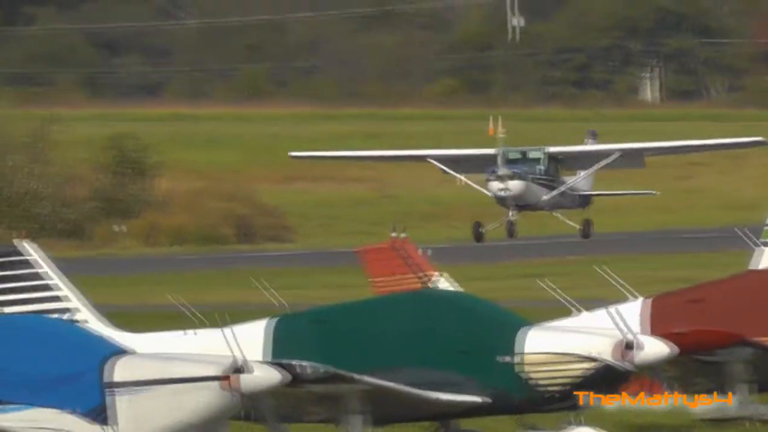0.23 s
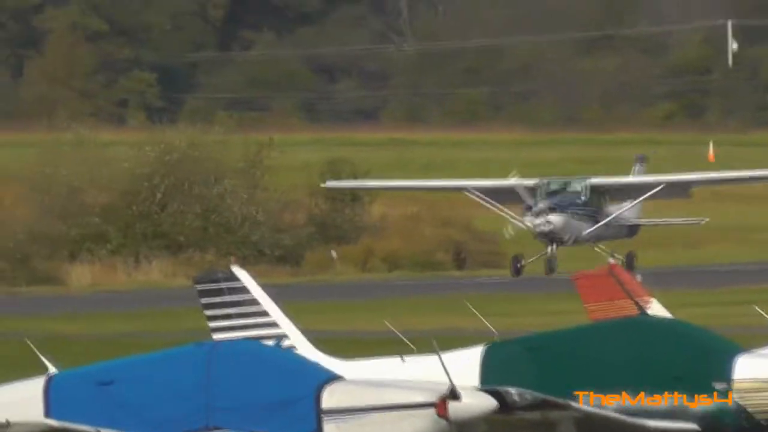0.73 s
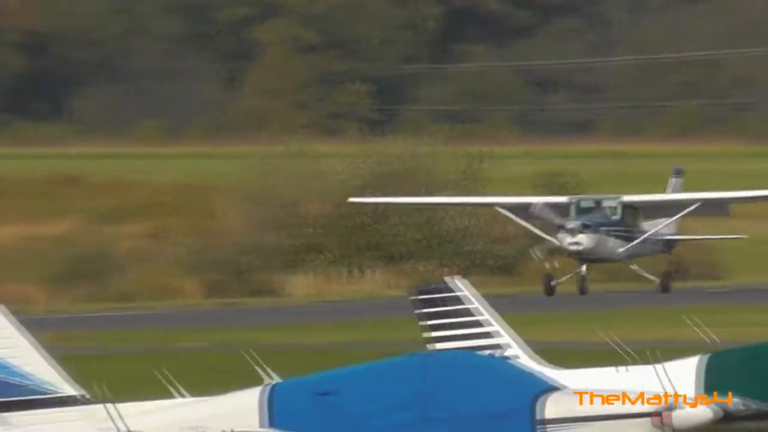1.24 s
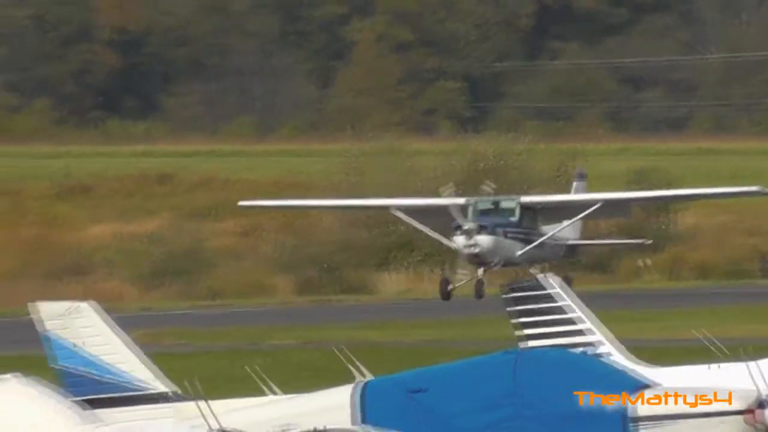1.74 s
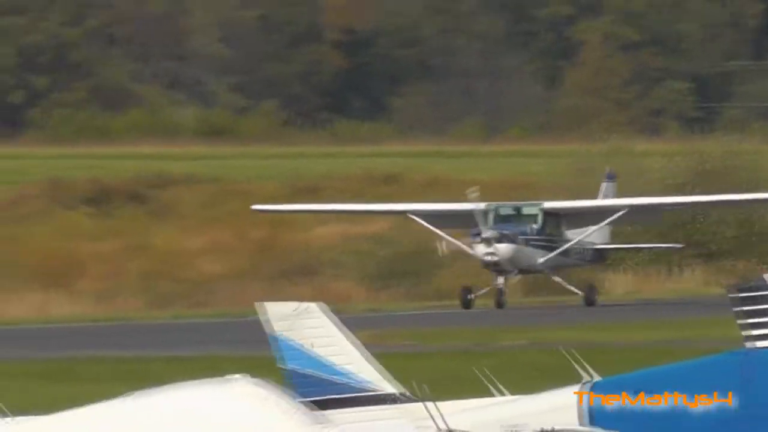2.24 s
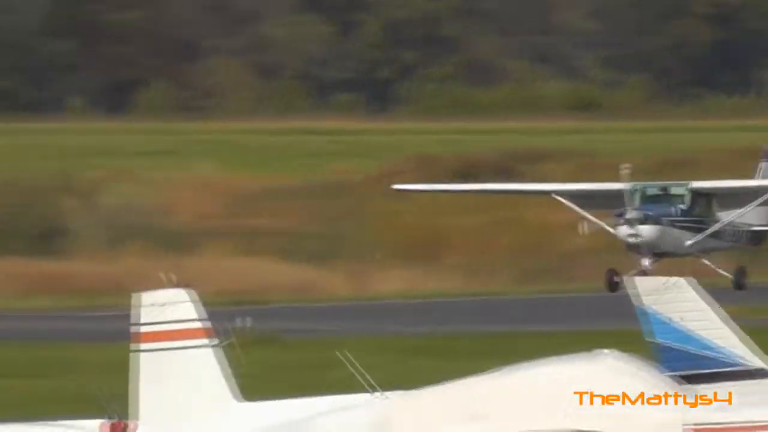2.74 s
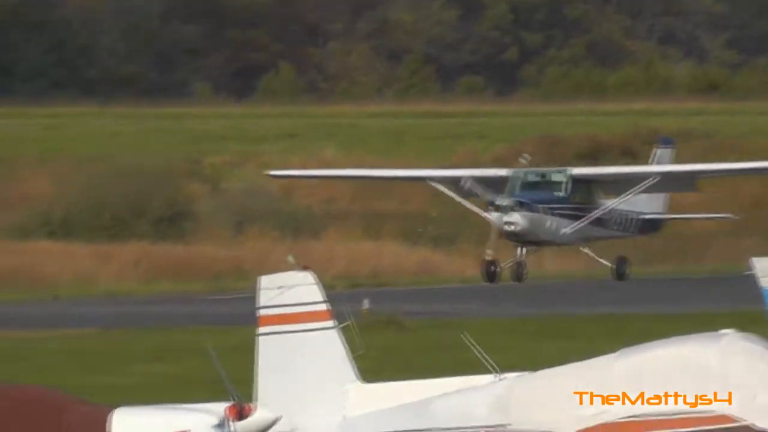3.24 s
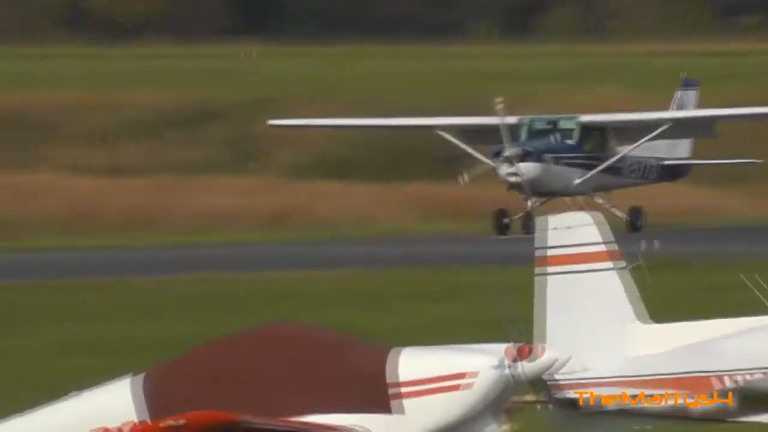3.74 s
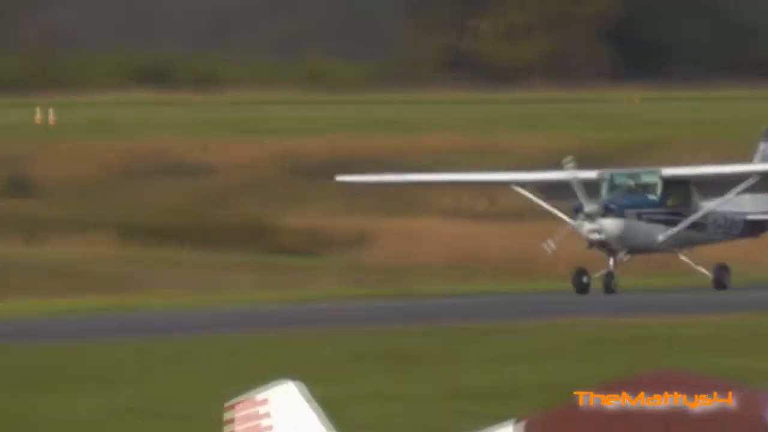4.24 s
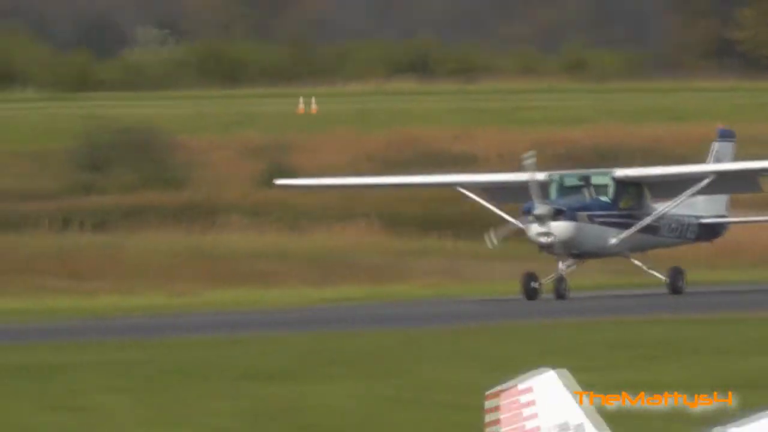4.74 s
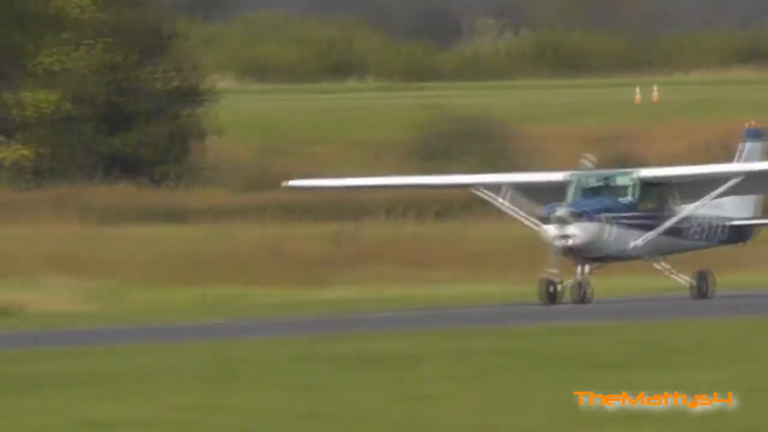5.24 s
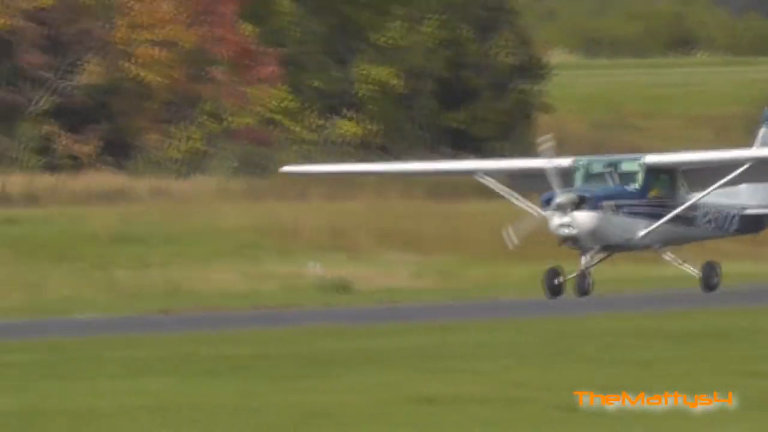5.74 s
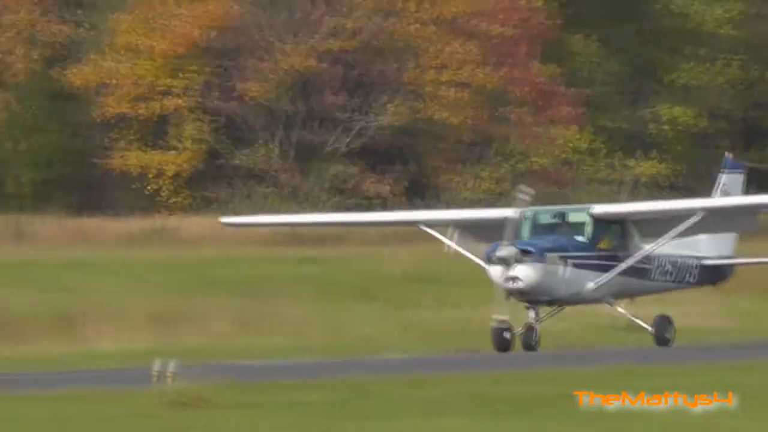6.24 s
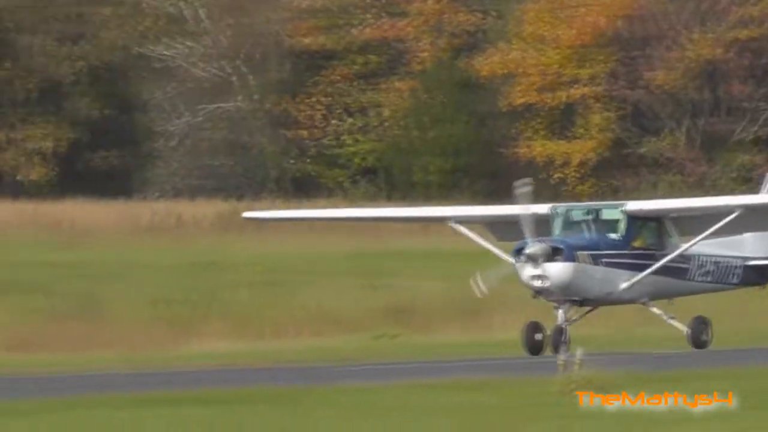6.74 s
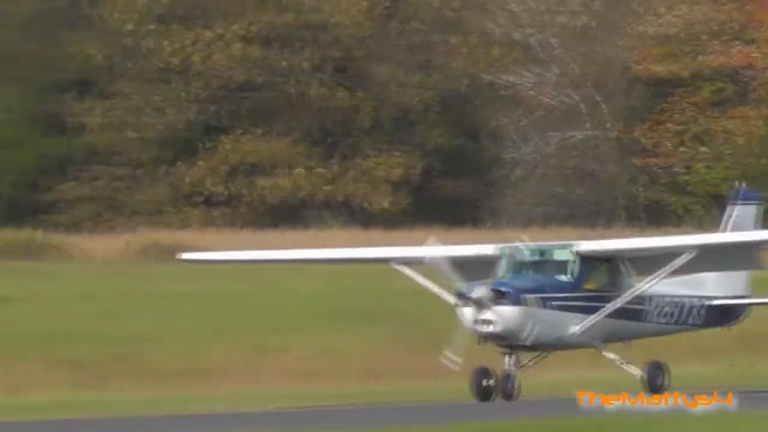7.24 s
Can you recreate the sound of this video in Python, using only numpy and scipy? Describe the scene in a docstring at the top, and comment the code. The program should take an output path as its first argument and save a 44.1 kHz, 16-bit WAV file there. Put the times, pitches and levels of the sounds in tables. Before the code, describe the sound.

A light aircraft's piston engine starts outdoors. First come quiet, separate exhaust coughs and one soft rush of air over a steady background hum. After nearly two seconds the cylinders fire, and the low, thumping note climbs quickly in pitch and loudness, with a rasping hiss on top. Past the middle it winds down to a lumpy, popping idle, heard from one spot on the airfield.

```python
"""On an airfield, over the drone and hum of a steady machine, a seven-cylinder radial engine is cranked.
It coughs single puffs that ring in the exhaust stacks, and a soft rush passes between them.
At 1.7 s it catches: the firings build a low tone, thump in the pipes and spit hiss from the stacks.
It revs up until about 4 s, then settles back with stumbles and stray putts.
Throughout, surfaces close to the microphone cut narrow notches into everything."""
import sys
import numpy as np
from scipy import signal
from scipy.fft import rfft, irfft, next_fast_len
from scipy.io import wavfile
from scipy.ndimage import uniform_filter1d, map_coordinates

SR = 44100
rng = np.random.default_rng(int(sys.argv[2]) if len(sys.argv) > 2 else 0)


def pcm_store(signal):
    """Save signal as 16-bit PCM."""
    levels = np.round(np.clip(np.atleast_2d(signal), -1, 1) * 32767)
    wavfile.write(sys.argv[1], SR, levels.astype(np.int16).T)


N = 329868
TIME = np.arange(N) / SR

# each cylinder's firing (place in the engine cycle [0-1], thump [dB], spit [dB])
CYLINDER_FIRINGS = [(0.018, -5.5, -2.5), (0.153, 3.5, -6), (0.291, -7, -2), (0.398, 5, -8), (.56, -5, -5.5),
                    (.72, 8.5, -3), (0.9, -1.5, -7)]
# midrange bark of the stacks (frequency [Hz], level [dB])
BARK_COLOUR = [(250, -48.5), (340, -2), (440, -4), (520, -9.5), (655, -1), (740, -6.5), (850, -7),
               (1120, -9), (1700, -19), (2000, -51.5)]


def engine():
    """The running engine: cylinders fire in turn, and the throttle drives every exhaust layer."""
    # revs (time [s], firing rate [1/s])
    revs = [(1.7, 32.2), (2.1, 40.5), (2.3, 43), (2.7, 53.8), (2.9, 57.7), (3.3, 63.3), (3.7, 66.7),
            (4.2, 68.6), (4.5, 67.9), (5.1, 65.1), (5.5, 63.4), (5.7, 62), (6.3, 55.7), (6.9, 48.6),
            (7.47, 47.2)]
    # throttle as loudness against full power (time [s], level [dB])
    throttle = [(1.8, -7), (2.1, -3.5), (2.7, 0.5), (3.0, -0.85), (3.5, 0.6), (4.2, -1.6), (4.8, -4.5),
                (5.4, -5.5), (5.7, -6.5), (6.2, -13), (6.9, -12.5), (7.2, -11), (7.48, -14)]
    # how far the engine has settled (time [s], share [0-1])
    settling = [(4.2, 0.043), (5.2, 0.36), (6.2, 0.82), (7.48, 1)]
    # tone, thump, bark, hiss, fizz (full-power level [dB], throttle follow [dB/dB], settled gain [dB])
    layers = [(-30, 0.8, 3.6), (-32.5, 0.28, -1), (-36.5, 1.01, 0.4), (-40, 0.91, 0.5), (-55.5, 0.59, -1.5)]
    catch_s = revs[0][0]
    since_catch = TIME - catch_s
    running = since_catch > 0
    settled = curve(settling)
    tone_db, thump_db, bark_db, hiss_db, fizz_db = (
        db + follow * curve(throttle) + settled_db * settled for db, follow, settled_db in layers)
    fizz_db -= 1.58 * np.minimum(since_catch, 3.8)  # the fizz dulls for 3.8 s as the engine warms

    cycle_hz = curve(revs) / len(CYLINDER_FIRINGS)
    cycle = np.cumsum(cycle_hz * running) / SR
    pushes, spits = firings(cycle, running)
    build_up = np.clip(since_catch / 0.78, 0, 1) ** 2
    tone = amp(tone_db) * build_up * exhaust_tone(cycle, cycle_hz)
    thump = amp(thump_db) * pipe_thump(cycle, cycle_hz, pushes)
    gas = stack_gas(spits, settled, bark_db, hiss_db, fizz_db)
    thump_duck, gas_duck = flow_dips(cycle, settled)
    fade_in = np.clip(since_catch / 0.12, 0, 1)
    return fade_in * (tone + thump * thump_duck + gas * gas_duck)


def firings(cycle, running):
    """Pipe impulses and a spit envelope; uneven mixture varies strength and nudges the impulses."""
    place, push_db, spit_db = np.transpose(CYLINDER_FIRINGS)
    turns = np.arange(int(cycle[-1]) + 1)[:, None]
    when = np.interp((turns + place).ravel(), cycle[running], TIME[running])
    jitter, push_scatter, spit_scatter = rng.standard_normal((len(when), 3)).T
    pushes = impulses(when + .0012 * jitter, np.tile(push_db, len(turns)) + 3 * push_scatter)
    spits = impulses(when, np.tile(spit_db, len(turns)) + 1.5 * spit_scatter)
    return pushes, unit(gas_bursts(spits, rise_s=0.0004, t60_s=0.069, echo_t60_s=0.28))


def engine_order(order, cycle, waver_db, spread):
    """One wavering harmonic of the cycle; spread phases keep the harmonics from meeting in a lump."""
    phase = 2 * np.pi * order * cycle + spread * np.pi * order ** 2 / len(CYLINDER_FIRINGS)
    return amp(waver_db * wobble(3.25)) * np.sin(phase + 0.58 * wobble(1.5))


def exhaust_tone(cycle, cycle_hz):
    """The low note of the exhaust; short stacks radiate little deep bass."""
    # low harmonics (order [per cycle], level [dB])
    harmonics = [(7, -3), (8, -16.5), (9, -2), (10, -16), (11, -22), (14, -22), (16, -16)]
    radiated = lambda hz: hz ** 2 / (hz ** 2 + 90 ** 2)
    return np.sqrt(2) * sum(
        amp(db) * radiated(order * cycle_hz) * engine_order(order, cycle, waver_db=0.9, spread=3)
        for order, db in harmonics)


def pipe_thump(cycle, cycle_hz, pushes):
    """The repeating part of the cycle sings in the pipes while each firing knocks them, over a rumble."""
    # harmonics that excite the pipes (order [per cycle], level [dB])
    harmonics = [(18, 3.5), (19, 11.5), (20, 10.5), (21, 9.5), (22, 8.5), (23, 5.5), (24, -4), (25, -2),
                 (26, -6.5), (28, 1), (29, -6), (30, -5), (31, -4.5), (33, -8.5), (34, -2)]
    # low rumble (frequency [Hz], level [dB])
    rumble_colour = [(20, -19), (45, -7.5), (90, -3), (140, -2), (320, -5), (400, -35)]
    song = sum(
        amp(db) * np.abs(pipe(order * cycle_hz)) * engine_order(order, cycle, waver_db=1.6, spread=5)
        for order, db in harmonics)
    knocks = filtered(pushes, pipe)
    return .95 * unit(song) + .28 * unit(knocks) + amp(-10.5) * rush(rumble_colour, patchy_db=-1.5)


def pipe(f):
    """Response of the exhaust resonances, passed twice."""
    # pipe resonances (frequency [Hz], width [Hz], level [dB])
    modes = [(206, 96, -4), (291.7, 96, -1.5)]
    return sum((-1) ** k * amp(db) * 1j * f * width / (hz * hz - f * f + 1j * f * width)
               for k, (hz, width, db) in enumerate(modes)) ** 2


def stack_gas(spits, settled, bark_db, hiss_db, fizz_db):
    """Gas leaves the stacks in spits of noise whose colour shifts as the engine settles."""
    # hiss and fizz, early and settled, and the crackle on top (frequency [Hz], level [dB])
    early_hiss, late_hiss = [(1500, -20), (1900, -4.5), (2250, -7.5), (2750, -2), (3300, -8.5), (3700, -18),
                             (4300, -30), (5000, -40.5)], [(1300, -25), (1650, -6), (1980, 1.96), (2300, -4), (2750, -7),
                                           (3300, -9), (3750, -17), (4200, -30), (5000, -50)]
    early_fizz, late_fizz = [(3800, -24.5), (4500, -3), (5700, 5.5), (6600, -2), (7400, -14), (8000, -11),
                             (9500, -42.5), (11000, -49)], [(3800, -26), (4500, -2.5), (5400, 0), (6000, -4.5), (6800, 2.5),
                                           (7500, -8.5), (9500, -42.5), (11000, -48.5)]
    crackle_colour = [(7000, -13.5), (8000, 2), (9500, -7), (11000, -23)]

    def crossfade(early, late, patchy_db):
        return np.sqrt(1 - settled) * rush(early, patchy_db) + np.sqrt(settled) * rush(late, patchy_db)

    bark = amp(bark_db) * rush(BARK_COLOUR, patchy_db=2.5)
    hiss = amp(hiss_db) * crossfade(early_hiss, late_hiss, patchy_db=2.6)
    fizz = amp(fizz_db) * crossfade(early_fizz, late_fizz, patchy_db=2.94)
    crackle = amp(fizz_db - 22.5) * rush(crackle_colour, patchy_db=3.5)
    return (0.48 + .35 * spits) * bark + spits * (hiss + fizz) + spits ** 2 * crackle


def gas_bursts(train, rise_s, t60_s, echo_t60_s):
    """Envelope of quick gas bursts: their powers add, and the field answers each with a longer echo."""
    t = np.arange(SR // 2) / SR
    attack = 1 - np.exp(-t / rise_s)
    burst = attack ** 2 * amp(-120 * t / t60_s)
    echo = attack * amp(-120 * t / echo_t60_s)
    power = signal.fftconvolve(train ** 2, burst / burst.max() + echo)[:N]
    return np.sqrt(np.abs(power))


def flow_dips(cycle, settled):
    """Gains for thump and gas: the flow lulls in every cycle and drops when a firing misses."""
    # lulls (place [0-1], half width [cycles], cold depth [dB], settled depth [dB], gas share [0-1])
    lulls = [(.43, 0.015, -0.5, 2.5, .2), (0.779, 0.028, 5, 2.5, 0.73)]
    # missed firings (time [s], half length [s], depth [dB])
    stumbles = [(1.78, 0.017, 5), (2.018, 0.013, 9), (5.532, 0.021, 5), (5.809, 0.0083, 8.5),
                (5.974, 0.012, 11), (6.285, 0.012, 3), (6.764, 0.032, 4.5), (6.888, 0.0086, 11)]
    thump_dip_db = sum(db * bell(TIME - s, half) for s, half, db in stumbles)
    gas_dip_db = .45 * thump_dip_db
    for place, half, cold_db, settled_db, gas_share in lulls:
        offset = (cycle - place + .5) % 1 - .5
        lull_db = bell(offset, half) * (cold_db + (settled_db - cold_db) * settled)
        thump_dip_db += lull_db
        gas_dip_db += gas_share * lull_db
    return amp(-thump_dip_db), amp(-gas_dip_db)


def puffs():
    """A puff of gas swells and sinks, rings briefly in its stack and leaves an echo."""
    # puffs, alone at first, then over the engine (time [s], level [dB], ring [Hz], bark over hiss [dB])
    coughs = [(0.1481, -53.5, 2860, -11), (0.186, -70, 2900, -8), (0.2175, -53, 3150, -9),
              (0.258, -66.5, 2900, -6), (0.3411, -46.5, 1930, -2), (0.373, -62, 2920, -2),
              (0.7511, -52.5, 2550, -1), (0.7995, -49, 2580, -1), (0.8465, -50.5, 2610, -13),
              (0.8814, -48.5, 1920, -7), (0.925, -70, 2800, -8), (1.1672, -50, 2610, -.5),
              (1.205, -63, 2760, -5), (1.2417, -48, 2595, -8), (1.275, -70, 2800, -8),
              (1.4243, -44, 3330, -3), (1.4675, -52, 2010, 9), (1.5005, -54, 1900, 3),
              (1.5637, -52, 2780, 4), (1.5908, -48.5, 3470, 4.5), (1.717, -47.5, 2840, -5),
              (1.7475, -51, 2960, 3), (1.8093, -46.5, 2810, -6), (1.8557, -49.5, 2820, 1.5),
              (1.8827, -48, 2600, -3), (1.952, -44, 2560, -4), (2.084, -43, 2520, -1.5),
              (2.242, -48.5, 2820, 6.5), (2.8464, -39.5, 2850, 0), (2.9836, -39.5, 2480, -6),
              (3.079, -39.5, 2390, -8), (3.3217, -39, 2690, -4), (3.4111, -39, 2600, -8),
              (3.5365, -41.5, 2570, -2), (3.751, -49, 2800, 10), (4.0447, -40.5, 2810, -15),
              (4.2522, -42.5, 2160, -9), (4.4603, -50, 2840, -9), (4.6743, -46, 2600, 2),
              (4.8545, -48.5, 2510, 6.5), (4.9914, -44, 2100, -15), (5.3157, -45.5, 2270, -16),
              (5.5368, -43.5, 1840, -5), (5.8393, -49, 2440, 0), (6.3834, -55, 2040, -10),
              (6.4953, -52, 1850, -5), (6.6274, -53, 2660, -9), (6.9062, -58, 2170, -11),
              (7.0519, -51, 1980, -17), (7.1147, -51, 2210, -2), (7.3457, -53, 1960, -17)]
    # hiss and fizz of a puff (frequency [Hz], level [dB])
    hiss_colour, fizz_colour = [(1500, -37), (1950, 0.5), (2300, -9.5), (2750, 4), (3400, -4), (3900, -14),
                                (4400, -21), (5200, -43)], [(4200, -24.5), (5000, -2.5), (6300, -0.5), (7000, -10),
                                                   (8000, -13.5), (9500, -27.5), (11000, -48.5)]
    hiss = rush(hiss_colour, patchy_db=2.5)
    fizz = rush(fizz_colour, patchy_db=4.5)
    bark = rush(BARK_COLOUR, patchy_db=-0.5)
    thump = unit(filtered(rng.standard_normal(N), pipe))
    lead, tail = SR // 20, SR // 3
    out, t = np.zeros(N), np.arange(-lead, tail) / SR
    for s, db, ring_hz, bark_db in coughs:
        bark_hz = 657 * np.exp(.03 * rng.standard_normal())
        fizz_db = -18 - 1.4 * s + 2 * rng.standard_normal()  # cold puffs are brighter
        thump_db = -8.5 + 2 * rng.standard_normal()
        width_s = .012 * .5 ** (s / 4.2)  # ever shorter as the engine warms
        at = slice(round(s * SR) - lead, min(N, round(s * SR) + tail))
        age = t[:at.stop - at.start] - .003
        envelope = bell(age, np.where(age < 0, 0.6 * width_s, width_s))
        drift = np.cumsum(rng.standard_normal((2, len(t))), axis=1)  # turbulence blurs the rings
        drift = uniform_filter1d(drift, size=60, axis=1)[:, :len(age)]
        ring = 1.2 * np.sin(2 * np.pi * ring_hz * age + 0.041 * drift[0])
        ring += 1.07 * amp(bark_db) * np.sin(2 * np.pi * bark_hz * age + 0.023 * drift[1])
        gas = hiss[at] + amp(fizz_db) * fizz[at] + amp(bark_db) * bark[at] + amp(thump_db) * thump[at]
        echo_envelope = amp(-6 - 60 * age / .28) * np.clip(age / width_s + 1, 0, 1)
        echo = echo_envelope * (gas + amp(fizz_db - 4) * fizz[at])  # the echo keeps more fizz
        out[at] += amp(db) * (envelope * (ring + gas) + echo)
    return out


def putts():
    """A putt rings a pipe for a set number of cycles, roughened by low noise."""
    # stray putts and barks (time [s], level [dB], pitch [Hz])
    hits = [(1.417, -35.5, 259), (1.589, -38, 204), (1.706, -41, 275), (1.801, -31, 252), (2.101, -34, 302),
            (2.433, -23, 246), (2.846, -20.5, 867), (3.534, -18.5, 661), (3.603, -21.5, 650),
            (6.021, -32, 197), (6.119, -33.5, 237), (6.309, -31.5, 245), (6.439, -29, 238),
            (6.622, -31.5, 263), (6.682, -38, 251), (6.817, -37.5, 247), (6.897, -33.5, 213.5),
            (7.132, -39, 262), (7.284, -34.5, 195), (7.435, -33.5, 266)]
    rise_cycles, t60_cycles = 1.4, 42
    out, t = np.zeros(N), np.arange(SR // 4) / SR
    grit = 0.42 * unit(filtered(rng.standard_normal(N), pipe))
    for s, db, hz in hits:
        at = slice(round(s * SR), min(N, round(s * SR) + len(t)))
        cycles = hz * t[:at.stop - at.start]
        envelope = (1 - np.exp(-cycles / rise_cycles)) * amp(db - 60 * cycles / t60_cycles)
        out[at] += envelope * (np.sin(2 * np.pi * cycles) + grit[at])
    return out


def soft_rush():
    """A brief breath of midrange noise between the first puffs."""
    # its swell (time [s], half length [s], level [dB])
    swells = [(0.475, 0.053, -44.5)]
    # its colour (frequency [Hz], level [dB])
    colour = [(600, -16), (1000, 4), (1500, -12), (2100, -16), (2800, -29)]
    return sum(amp(db) * bell(TIME - s, half) for s, half, db in swells) * rush(colour, patchy_db=-2.5)


def machine():
    """A nearby machine lays down a steady drone with slightly wavering hum tones."""
    # hum tones (frequency [Hz], level [dB], waver [dB])
    hum_tones = [(118.4, -56, 1.5), (432.6, -58, 3), (557.3, -52, 3)]
    # drone colour (frequency [Hz], level [dB])
    drone_colour = [(25, -26), (60, -17), (92, -15.5), (115, -11), (180, -11), (270, -8.5), (430, -12.5),
                    (690, -13.5), (1140, -14), (1500, -22), (2100, -31.5), (3000, -34), (4900, -54.5),
                    (6500, -49.5), (8500, -55.5), (11000, -71)]
    # level rides of hum and drone (time [s], level [dB])
    hum_ride, drone_ride = [(0, -2), (.8, 0.5), (1.4, 2.5), (2.2, -2), (4.8, 1), (5.5, -2), (6.9, -2),
                            (7.3, 1.5), (7.48, 4)], [(0, -50), (.5, -47.5), (1.3, -47), (7.48, -49.5)]
    hum = np.zeros(N)
    for hz, db, waver_db in hum_tones:
        level = amp(db + waver_db * wobble(9.8) + curve(hum_ride))
        hum += level * np.sin(2 * np.pi * hz * TIME + 0.3 * waver_db * wobble(6))
    drone = amp(curve(drone_ride) + 1.4 * wobble(7.0)) * rush(drone_colour, patchy_db=1.5)
    return hum + drone


def amp(db):
    return 10 ** (np.asarray(db) / 20)


def unit(x):
    """x scaled to rms 1 over the last two thirds of the scene."""
    return x / np.sqrt(np.mean(x[N // 3:] ** 2) + 1e-20)


def bell(offset, half_width):
    return np.exp(-.5 * (offset / half_width) ** 2)


def curve(rows):
    """Straight lines through (time, value) points, one value a sample."""
    return np.interp(TIME, *np.transpose(rows))


def wobble(rate):
    """A smooth random curve, rate knots a second."""
    return map_coordinates(rng.standard_normal(int(N * rate / SR) + 4), [TIME * rate])


def filtered(x, response):
    """x through a complex frequency response."""
    size = next_fast_len(N + SR // 2)
    return irfft(rfft(x, size) * response(np.fft.rfftfreq(size, 1 / SR)), size)[:N]


def rush(colour, patchy_db):
    """Coloured noise of rms 1 with patches of random gain in time and frequency."""
    bins = signal.stft(rng.standard_normal(N), nperseg=256)[2]
    patches = uniform_filter1d(rng.standard_normal(bins.shape), size=3, axis=0)
    patches = uniform_filter1d(patches, size=5, axis=1)
    noise = signal.istft(bins * amp(patchy_db * patches / patches.std()), nperseg=256)[1][:N]
    hz, db = np.transpose(colour)
    response = lambda f: amp(np.interp(np.log(f + 1), np.log(hz), db, left=-120, right=-120))
    return unit(filtered(noise, response))


def impulses(seconds, db):
    """A train of one-sample clicks."""
    at = np.clip(np.round(seconds * SR).astype(int), 0, N - 1)
    return np.bincount(at, amp(db), N)


def scene():
    """The engine, its puffs and putts, the soft rush and the machine, mixed in mono."""
    return (engine() + puffs() + putts() + soft_rush() + machine())[None]


def record(dry):
    """Notches and small peaks from close surfaces, a steep bass cut and a band limit."""
    # notches from close surfaces (frequency [Hz], width [Hz], depth [dB])
    notches = [(347, 8, 15.5), (472, 10, 9), (588, 29, 6), (783, 41, 9), (987, 123, 7), (1174, 34.5, 8),
               (1675, 26, 5), (1810, 59, 15), (2375, 54, 8), (3136, 215, 10)]
    # small resonances near the microphone (frequency [Hz], width [Hz], gain [dB])
    resonances = [(643, 17, 3), (816, 8.8, 4), (1151, 22, 5.5), (1229, 6.8, -2), (1397, 11, 8.5),
                  (1680, 42, 3.5), (1980, 18, 3), (2670, 15, -7.5), (3250, 27, 7), (3550, 13, 2.5),
                  (3574, 8.3, 5.5), (3620, 6, 6)]
    bass_hz, top_hz, gain_db = 68, 11100, 2.0
    bumps = lambda f, rows: sum(db / (1 + (2 * (f - hz) / width) ** 2) for hz, width, db in rows)
    surfaces = lambda f: amp(gain_db + bumps(f, resonances) - bumps(f, notches))
    bass_cut = lambda f: (1j * f / (bass_hz + 1j * f)) ** 4
    return filtered(dry[0], lambda f: surfaces(f) * bass_cut(f) * (f < top_hz))[None]


dry = scene()
out = record(dry)
pcm_store(out)
```